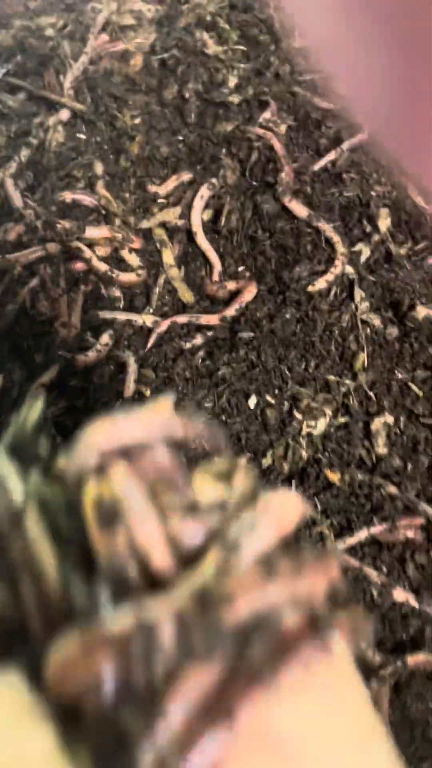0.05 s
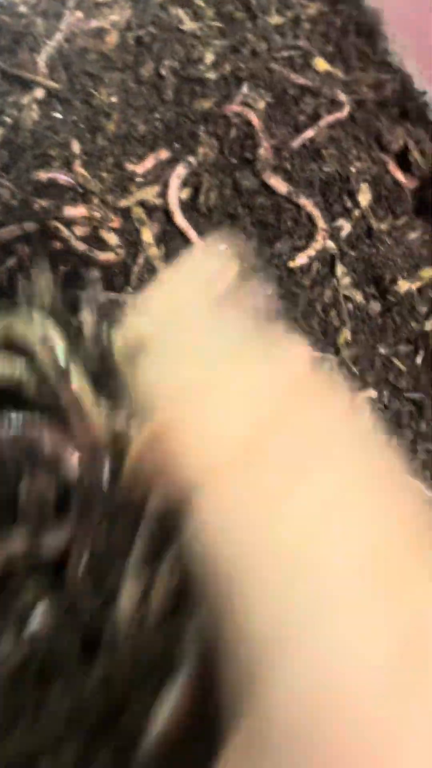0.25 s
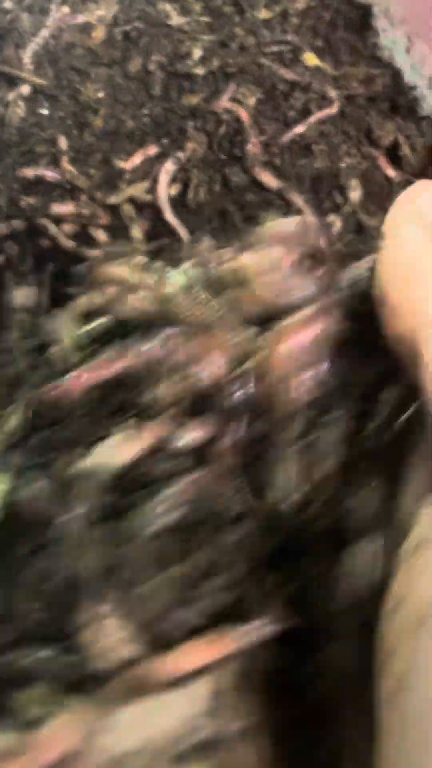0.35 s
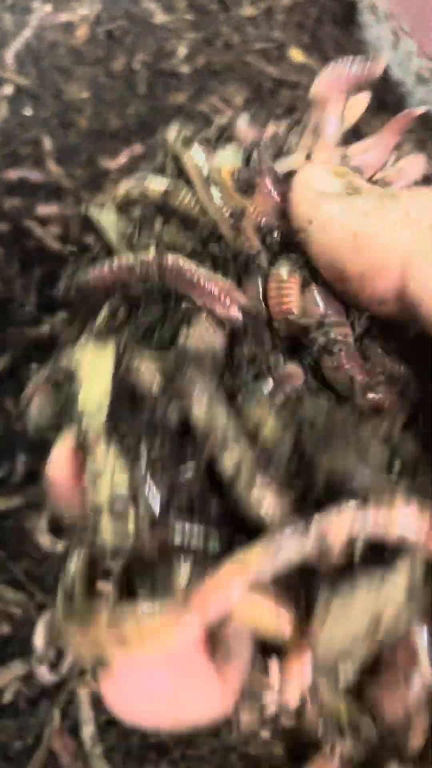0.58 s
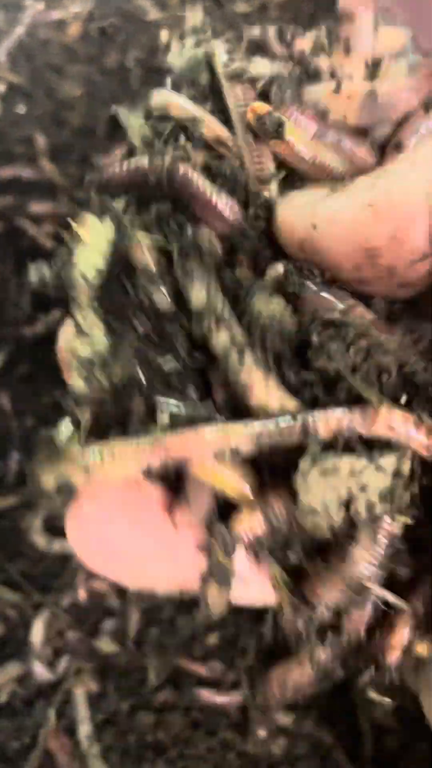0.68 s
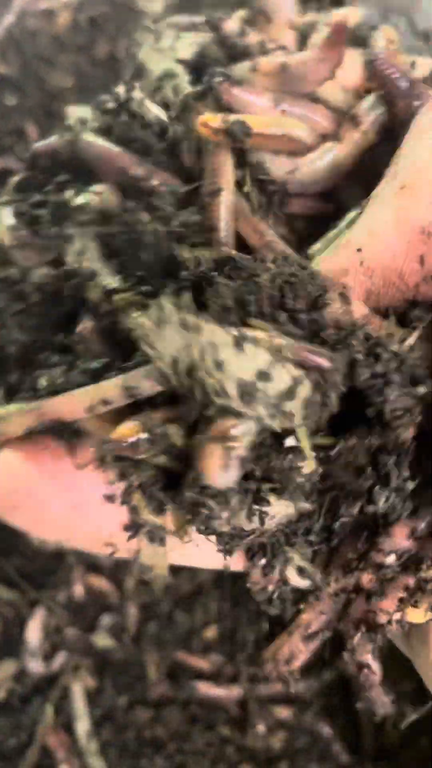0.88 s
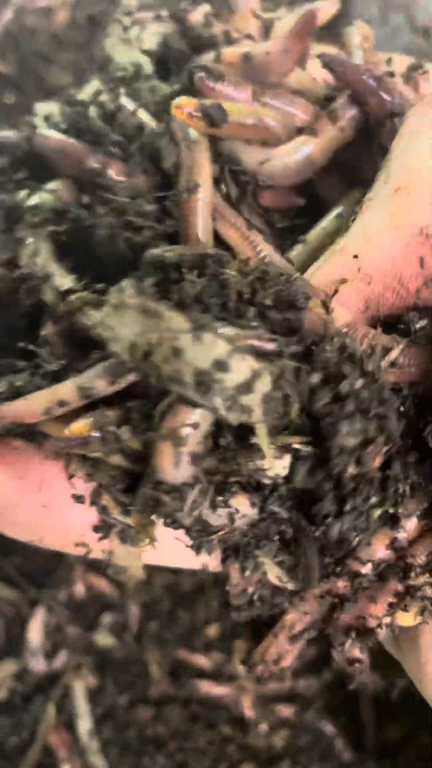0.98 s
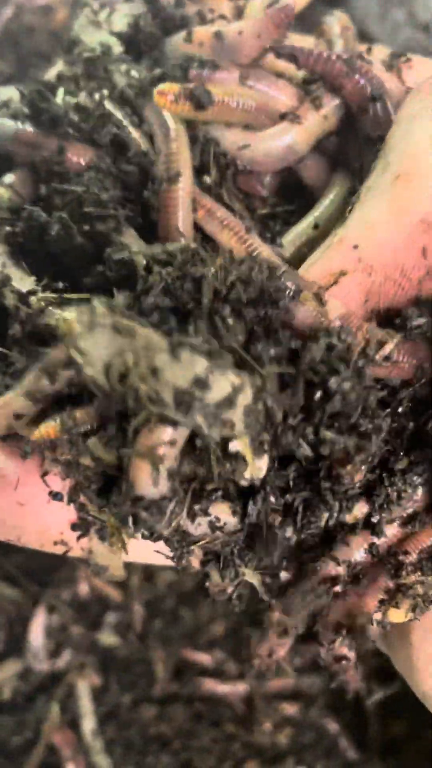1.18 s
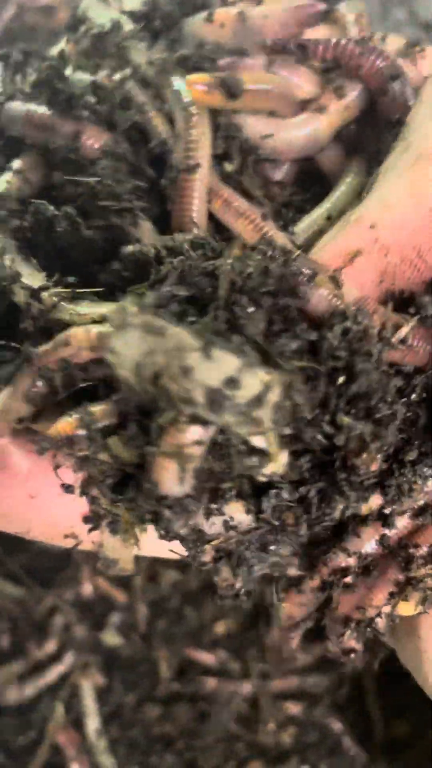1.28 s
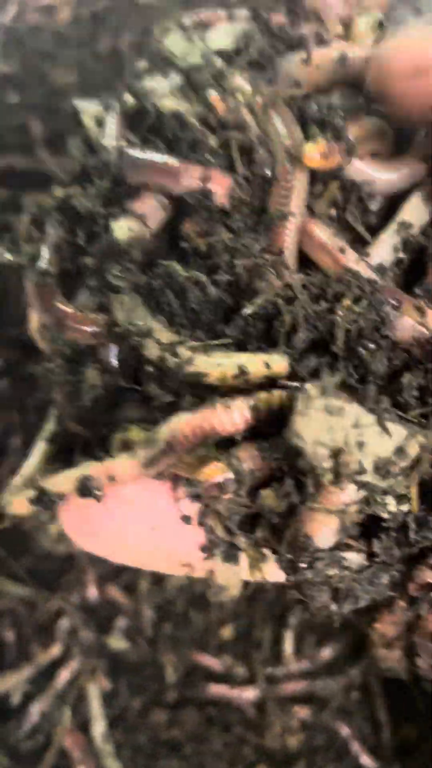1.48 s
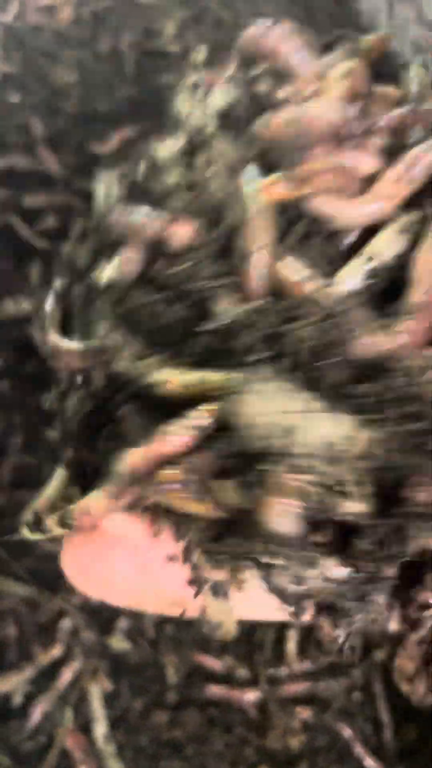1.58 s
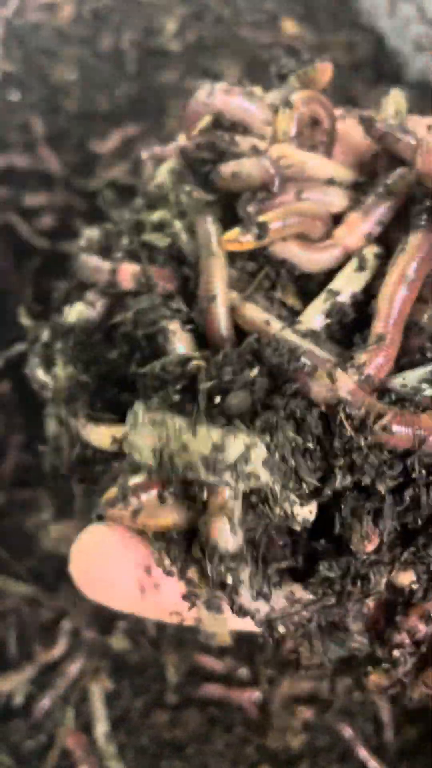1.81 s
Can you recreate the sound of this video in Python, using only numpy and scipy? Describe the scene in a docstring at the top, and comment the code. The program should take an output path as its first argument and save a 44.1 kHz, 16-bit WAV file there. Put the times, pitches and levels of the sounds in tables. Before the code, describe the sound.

A hand rummages through damp, wormy bedding, rustling and scraping, with two hard hollow box knocks

```python
"""A hand digs through damp bedding in a plastic box, close to a phone, in stereo.
First it scrapes and rustles (flickering noise and dense grains), and a hard knock rings the box modes.
After half a second it calms to soft pats (falling sines), small pitched ticks and a fainter knock.
At 1.5 s a second hard knock comes, then a short rustle; coloured noise makes the low rumble throughout,
and an airy hum of narrow noise puffs is strongest near 1.7 s."""
import sys
import numpy as np
from scipy import signal
from scipy.fft import rfft, irfft
from scipy.io import wavfile
from scipy.ndimage import uniform_filter1d

SR = 44100
rng = np.random.default_rng(int(sys.argv[2]) if len(sys.argv) > 2 else 0)


def master(y):
    """Save y as 16-bit WAV."""
    cut = np.clip(np.atleast_2d(y).T, -1, 1)
    pcm = np.round(cut * 32767)  # scale
    wavfile.write(sys.argv[1], SR, pcm.astype(np.int16))


N = 81585
T = np.arange(N) / SR  # s
HZ = np.arange(N // 2 + 1) * SR / N + 1e-3  # nudged off zero so that its log exists

# Colour of the low surroundings. Each row: frequency in Hz, gain in dB.
ROOM_COLOUR = [(25, -12.5), (50, -3), (75, 3.5), (120, -5.5), (200, -14.5), (300, -31), (480, -39),
               (1050, -39), (1400, -44.5)]
ROOM_DB, ROOM_FLICKER_DB, ROOM_FLICKER_RATE = -53, 2, 25.46  # rate in steps per second

# Colour of the narrow airy hum. Each row: frequency in Hz, gain in dB.
HUM_COLOUR = [(540, -26), (630, 1), (710, -2.5), (830, -12), (1050, -17)]
# Loudness of the hum over time. Each row: time in seconds, level in dB.
HUM_LEVELS = [(0, -64), (1.0, -61.5), (1.4, -62.5), (1.7, -57), (1.85, -64)]
PUFFS_PER_S, PUFF_S, PUFF_SCATTER_DB = 70, 0.011, 5

# Short pitched snaps: small ticks, and two of stepping-down pitch that open the second hard knock.
# Each row: start in seconds, level in dB, pitch in Hz.
PITCHED_SNAPS = [(0.767, -59, 6100), (0.787, -58, 12070), (0.7918, -61, 2830), (1.090, -59, 11200),
                 (1.212, -58, 9700), (1.2828, -50.5, 10800), (1.463, -61, 7900), (1.5403, -43, 1508),
                 (1.5433, -39.5, 1042), (1.778, -61, 11100)]
SNAP_PEAK_CYCLES, SNAP_TAIL_S, SNAP_TAIL_DB = 1.41, 0.007, -14.5

# Crackles of breaking crumbs. Each row: start in seconds, treble and body level in dB
# ahead of their colours, fade time constant in seconds.
CRACKLES = [(0.076, -82, -68, 0.0054), (0.2163, -45, -38.5, 0.0035), (0.343, -58.5, -55, 0.0033),
            (0.3775, -63, -52, 0.0068), (1.54, -49, -43, 0.0021)]
# Colour of the crackle treble. Each row: frequency in Hz, gain in dB.
CRACKLE_TREBLE = [(2500, -21), (4000, 11), (10500, 11.5), (16000, -18)]
# Colour of the crackle body. Each row: frequency in Hz, gain in dB.
CRACKLE_BODY = [(700, -14.5), (1100, 12), (2600, 7), (3500, -16)]

# Falling thuds: soft pats, and the first thump of each hard knock.
# Each row: start in seconds, level in dB, starting pitch in Hz.
THUDS = [(0.102, -40, 480), (.218, -24, 794), (0.47, -36.5, 662), (.696, -45, 734), (0.8821, -45, 778),
         (.921, -39.5, 486), (.939, -46, 548), (.958, -39, 590), (.970, -45.5, 625), (1.156, -46, 500),
         (1.290, -36.5, 562), (1.5437, -37, 510), (1.785, -41.5, 763)]
THUD_END_SHARE = .22  # final pitch as a share of the starting pitch
THUD_FALL_S, THUD_PEAK_S = .0038, .0048  # time constant of the pitch fall, time of the loudest point

# Ringing modes of the box wall. Each row: frequency in Hz, free 60 dB decay in seconds, swell in seconds.
BOX_MODES = [(65.7, 0.24, 0.018), (163.7, 0.11, 0.0064), (238.6, 0.088, 0.0086), (337.4, 0.058, 0.0029)]
# Knocks on the wall. Each row: start in seconds, share of the free ringing time,
# then the level in dB of each mode ahead of its swell and decay.
WALL_KNOCKS = [(0.2188, 0.91, -22.5, -4.5, -19.5, -11.5), (0.268, 0.75, -62.5, -29.5, -47, -26.5),
               (1.161, 0.52, -56, -33, -54, -73), (1.5473, 0.4, -16.5, -14.5, -26, -63)]

# Crumbs moving. Each row: time in seconds, rustle level in dB, fine treble hiss level in dB.
CRUMB_LEVELS = [(0, -63.5, -61.5), (0.029, -50.5, -67), (.058, -62.5, -60.5), (0.067, -50, -85),
                (.095, -56, -71), (.125, -52, -82), (.15, -58.5, -72), (0.211, -57.5, -60.5),
                (0.222, -46.5, -48.5), (.298, -51, -64.5), (.348, -51.5, -69), (0.36, -64, -74),
                (.42, -67.5, -76), (0.549, -74.5, -73.5), (1.041, -79.5, -71), (1.11, -83, -77.5),
                (1.535, -82.5, -74.5), (1.574, -61.5, -70), (1.63, -72, -78.5), (1.681, -85, -89),
                (1.85, -81, -77)]
# Colour of the rustling crumbs. Each row: frequency in Hz, gain in dB.
RUSTLE_COLOUR = [(600, 12), (1100, 0.5), (2400, -1.5), (3300, -5.5), (5000, -8.5), (10500, -10),
                 (13000, -21), (16000, -9.5)]
# Colour of the fine hiss. Each row: frequency in Hz, gain in dB.
HISS_COLOUR = [(1200, -16.5), (2200, -4.5), (3300, -23), (5500, -2), (10500, 0), (13000, -9), (16000, 5)]
GRAINS_PER_S, GRAIN_S, GRAIN_SCATTER_DB = 820, 0.0027, 2.5
RUSTLE_FLICKER_DB, RUSTLE_FLICKER_RATE = -0.8, 25.6

# Hand at work. Each row: time in seconds, then levels in dB of bright scrape, dull scrape, box rumble.
HAND_LEVELS = [(0, -44, -43.5, -54), (.03, -52, -46, -39.5), (.06, -55.5, -52.5, -53),
               (0.094, -43.5, -43, -47.5), (0.133, -35.5, -46, -37), (.16, -46.5, -41, -52),
               (.20, -41, -35.5, -50), (0.259, -47.5, -37, -31), (0.331, -54, -41, -63),
               (0.361, -67, -53, -37.5), (.40, -56.5, -53, -56.5), (0.504, -57, -54.5, -39.5),
               (.56, -66, -67, -64.5), (.95, -66.5, -58.5, -53), (1.501, -67.5, -69.5, -59.5),
               (1.601, -59.5, -54, -54), (1.659, -85, -74.5, -55.5), (1.85, -70, -80, -47.5)]
# Colours of bright scrape, dull scrape and box rumble, one list each.
# Each row of a list: frequency in Hz, gain in dB.
SCRAPE_COLOURS = [
    [(450, -7.5), (620, 6), (800, -3), (1000, -13), (1300, -32.5)],
    [(130, -3.5), (220, -1.5), (330, -9), (430, -8), (500, -15.5)],
    [(30, -18), (60, -1.5), (110, -3), (160, -15.5)],
]
SCRAPE_FLICKER_DB, SCRAPE_FLICKER_RATE = 1.5, 60.35

# Phase of the left channel against the right, half turned in each.
# Each row: frequency in Hz, phase in radians.
STEREO_PHASE = [(0, 0), (1380, -.7), (2500, .8), (4000, .7), (4820, -.4), (5600, .5), (6980, 3.14),
                (8180, 3.14), (10200, 6.28), (12200, 6.4), (13200, 9.42), (15000, 9.42), (15600, 10.6)]
# Strength of the scattered sound. Each row: frequency in Hz, gain in dB.
SCATTER_COLOUR = [(25, -43.5), (250, -14), (2000, -8), (6000, -3), (9000, -8.5), (16000, -13)]
TOP_HZ = 15850


def undb(db):
    """Decibels to gain."""
    return 10 ** (np.asarray(db) / 20)


def unit(x):
    """Scale to rms 1."""
    return x / np.sqrt(np.mean(x ** 2))


def follow(times, levels_db):
    """Gain that glides in dB from point to point."""
    return undb(np.interp(T, times, levels_db))


def colour(x, table):
    """Filter by (Hz, dB) points joined over log frequency, at -70 dB outside them."""
    hz, db = np.array(table).T
    gain = undb(np.interp(np.log(HZ), np.log(hz), db, -70, -70))
    return irfft(rfft(x) * gain, N)


def octave(x, centre):
    """Take one octave-wide part that crossfades into its neighbours at equal power."""
    share = np.clip(1 - np.abs(np.log2(HZ / centre)), 0, 1) ** .5
    return irfft(rfft(x) * share, N)


def walk(rate):
    """Slow random wander, spread 1, towards a new value rate times a second."""
    hold = int(SR / rate)
    steps = np.repeat(rng.standard_normal(N // hold + 1), hold)
    return unit(uniform_filter1d(steps, hold)[:N])


def flicker(table, depth_db, rate):
    """Coloured noise whose octave-wide parts flicker on their own."""
    out = np.zeros(N)
    for centre in 25 * 2. ** np.arange(7):
        gain = undb(depth_db * walk(rate))
        out += gain * octave(rng.standard_normal(N), centre)
    return unit(colour(out, table))


def grains(rate, length_s, scatter_db):
    """Noise under random sudden bursts whose energy adds up and fades exponentially."""
    struck = rng.random(N) < rate / SR
    size_db = scatter_db * np.minimum(rng.exponential(size=N), 2.5)
    hits = struck * undb(size_db)
    energy = signal.lfilter([1], [1, -np.exp(-1 / (length_s * SR))], hits ** 2)
    return np.sqrt(energy) * rng.standard_normal(N)


def room():
    """Low rumble of the surroundings: steady noise with a gentle flicker."""
    return undb(ROOM_DB) * flicker(ROOM_COLOUR, ROOM_FLICKER_DB, ROOM_FLICKER_RATE)


def airy_hum():
    """Short noise puffs squeezed into a narrow band."""
    puffs = grains(PUFFS_PER_S, PUFF_S, PUFF_SCATTER_DB)
    return unit(colour(puffs, HUM_COLOUR)) * follow(*np.array(HUM_LEVELS).T)


def pitched_snaps():
    """Sine bursts that rise and fade within a few cycles, each with its own pitch and a noisy tail."""
    out, t = np.zeros(N + SR), T[:SR // 20]
    crumble = uniform_filter1d(rng.standard_normal((len(PITCHED_SNAPS), len(t))), size=5) * 2
    for (start, db, hz), noise in zip(PITCHED_SNAPS, crumble):
        rise = t * hz / SNAP_PEAK_CYCLES
        burst = rise * np.exp(1 - rise)
        tail = undb(SNAP_TAIL_DB) * noise * np.exp(-t / SNAP_TAIL_S)
        out[int(start * SR):][:len(t)] += undb(db) * (burst + tail) * np.sin(2 * np.pi * hz * t)
    return out[:N]


def crackles():
    """Crumbs break in sudden noise bursts that fade exponentially, with separate treble and body."""
    fades = np.array([(T >= start) * np.exp(-np.clip(T - start, 0, 1) / fade_s)
                      for start, _, _, fade_s in CRACKLES])
    _, treble_db, body_db, _ = np.array(CRACKLES).T
    treble = undb(treble_db) @ fades * rng.standard_normal(N)
    body = undb(body_db) @ fades * rng.standard_normal(N)
    return colour(treble, CRACKLE_TREBLE) + colour(body, CRACKLE_BODY)


def falling_thuds():
    """Soft pats and the first thump of each hard knock: a sine that swells, fades and falls in pitch."""
    out, t = np.zeros(N + SR), T[:SR // 4]
    env = t ** 2 * np.exp(-2 * t / THUD_PEAK_S)
    env = env / env.max()
    fall = THUD_FALL_S * (1 - np.exp(-t / THUD_FALL_S))
    for start, db, start_hz in THUDS:
        turns = start_hz * (THUD_END_SHARE * t + (1 - THUD_END_SHARE) * fall)
        out[int(start * SR):][:len(t)] += undb(db) * env * np.sin(2 * np.pi * turns)
    return out[:N]


def wall_knocks():
    """After a knock each mode of the box wall swells and rings, shorter than when free."""
    out, t = np.zeros(N + SR), T[:SR // 4]
    hz, t60, swell_s = np.array(BOX_MODES).T[:, :, None]
    swell = 1 - np.exp(-(t / swell_s) ** 2)
    for start, free, *db in WALL_KNOCKS:
        decay = 1000 ** (-t / (t60 * free))
        modes = -swell * decay * np.sin(2 * np.pi * hz * t)
        out[int(start * SR):][:len(t)] += undb(db) @ modes
    return out[:N]


def rustle():
    """Crumbs as dense grains of uneven size, each octave crackling on its own, under a fine hiss."""
    crumbs = np.zeros(N)
    for centre in 800 * 2. ** np.arange(5):
        gain = undb(RUSTLE_FLICKER_DB * walk(RUSTLE_FLICKER_RATE))
        crumbs += gain * octave(grains(GRAINS_PER_S, GRAIN_S, GRAIN_SCATTER_DB), centre)
    hiss = grains(600, 0.004, 2.26)
    times, rustle_db, hiss_db = np.array(CRUMB_LEVELS).T
    return (unit(colour(crumbs, RUSTLE_COLOUR)) * follow(times, rustle_db)
            + unit(colour(hiss, HISS_COLOUR)) * follow(times, hiss_db))


def scrape():
    """Friction of fingers in the damp bedding, shaking the box: three bands of flickering noise."""
    times, *levels = np.array(HAND_LEVELS).T
    out = np.zeros(N)
    for table, db in zip(SCRAPE_COLOURS, levels):
        out += flicker(table, SCRAPE_FLICKER_DB, SCRAPE_FLICKER_RATE) * follow(times, db)
    return out


def bed():
    """The continuous noise layers, from the hand down to the surroundings."""
    return rustle() + scrape() + airy_hum() + room()


def scene():
    """All sources in stereo, with scattered sound of opposite sign and snaps equal in both channels."""
    direct = bed() + falling_thuds() + wall_knocks() + crackles()
    scattered = colour(bed(), SCATTER_COLOUR)  # fresh noise, unrelated to the direct sound
    # each channel turns by half of the phase
    turn = np.exp(.5j * np.interp(HZ, *np.array(STEREO_PHASE).T))
    left = irfft(rfft(direct) * turn, N) + scattered
    right = irfft(rfft(direct) / turn, N) - scattered
    return np.array([left, right]) + pitched_snaps()


def record(dry):
    """The phone cuts the top with a steep elliptic low-pass."""
    low_pass = signal.ellip(10, .2, 80, TOP_HZ, fs=SR, output="sos")
    return signal.sosfilt(low_pass, dry)


dry = scene()
out = record(dry)
master(out)
```